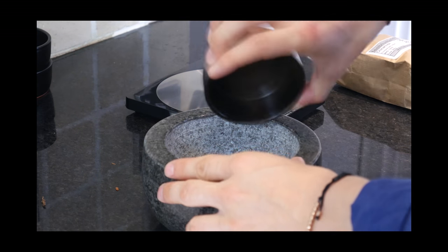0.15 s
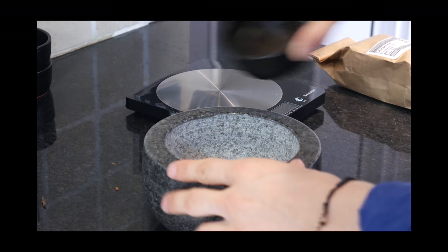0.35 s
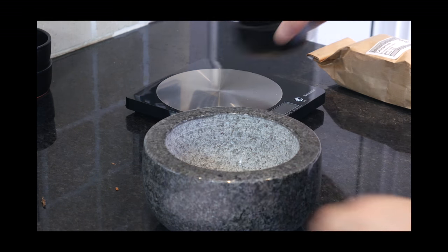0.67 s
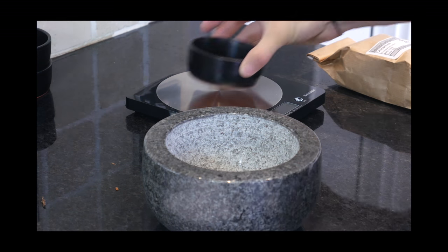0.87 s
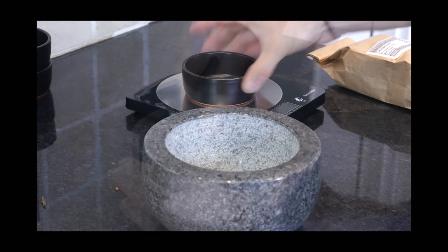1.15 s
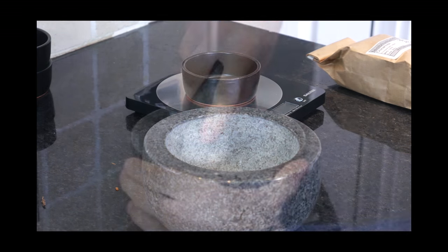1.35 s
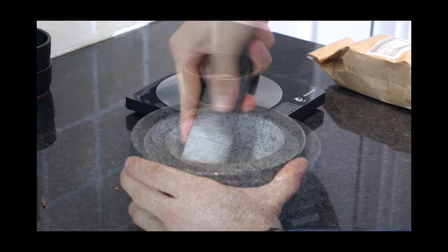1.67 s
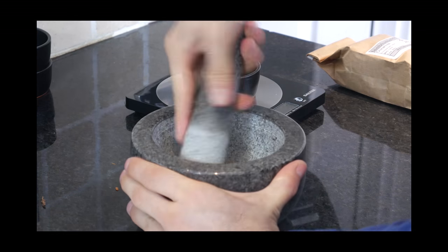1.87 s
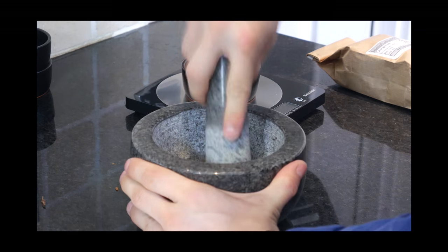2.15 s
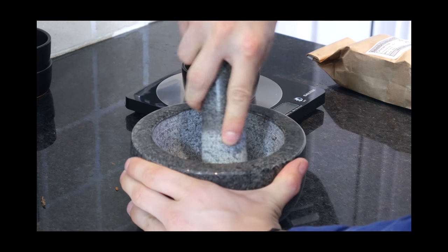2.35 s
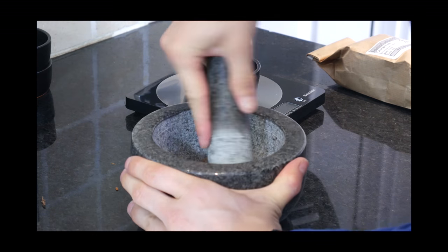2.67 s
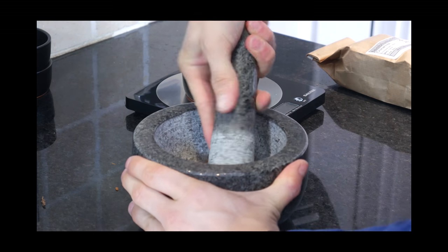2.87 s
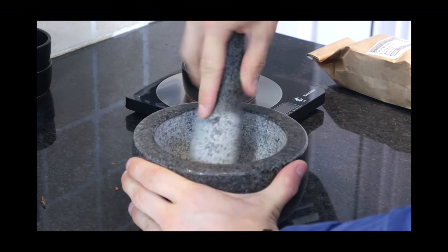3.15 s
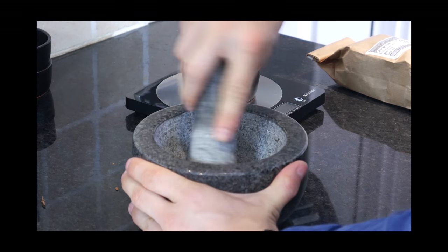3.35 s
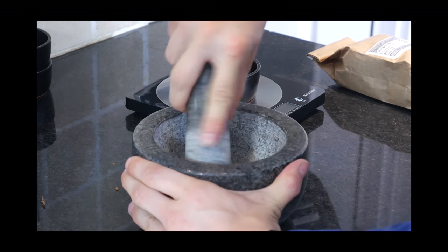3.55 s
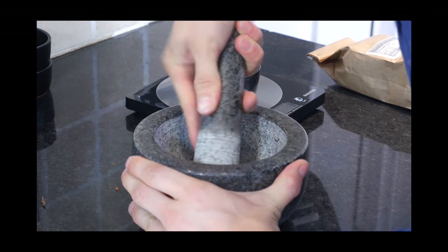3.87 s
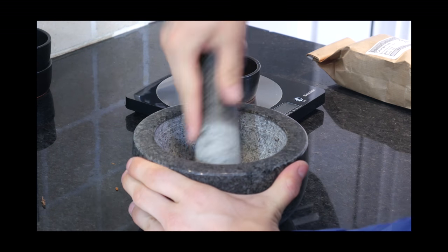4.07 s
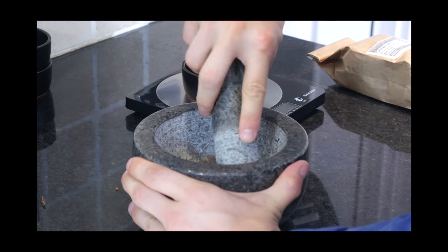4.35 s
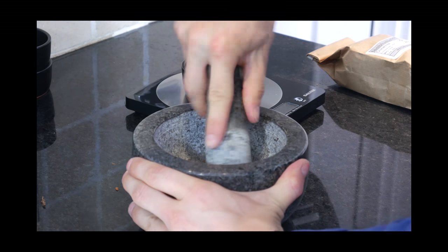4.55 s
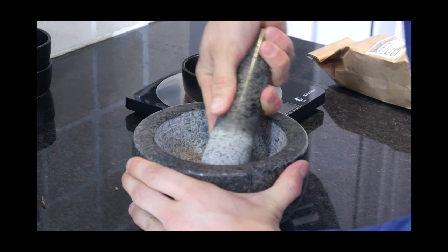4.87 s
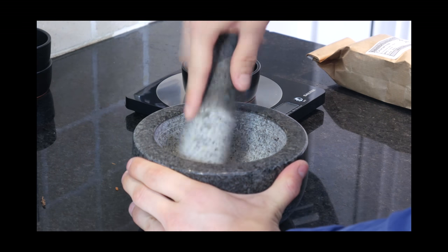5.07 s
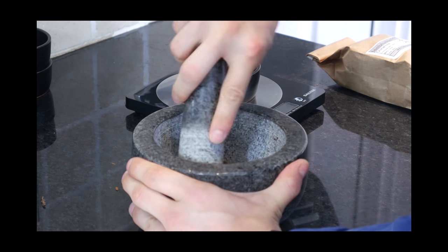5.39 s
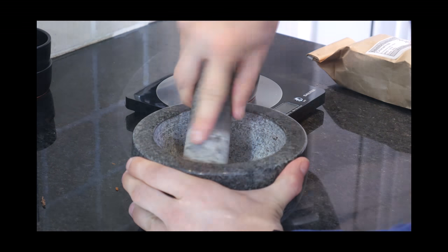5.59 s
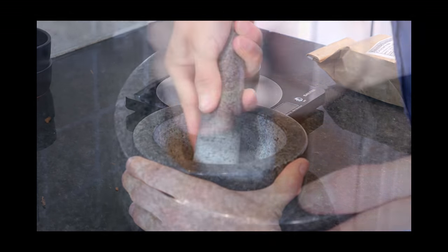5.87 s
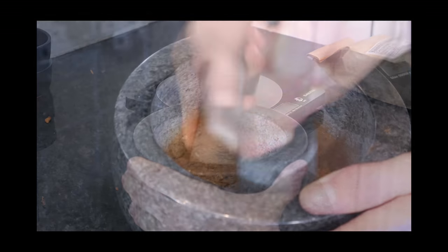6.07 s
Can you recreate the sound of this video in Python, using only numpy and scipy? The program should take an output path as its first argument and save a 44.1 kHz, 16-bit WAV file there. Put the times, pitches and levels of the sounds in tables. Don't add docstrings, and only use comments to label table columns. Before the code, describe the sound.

A soft finger knock and a brief bright dish clatter come first, over quiet room hiss. Stone then meets stone: dry, short mortar knocks, rough scrapes and small bark cracks, with dull thumps through the cabinet. The strongest blow briefly rings the bowl's lip. Miked closely in a small reflective kitchen, it ends in rapid grinding.

```python
import sys
import numpy as np
from scipy import signal
from scipy.fft import rfft, irfft, next_fast_len
from scipy.io import wavfile
from scipy.ndimage import uniform_filter1d

SR = 44100
rng = np.random.default_rng(int(sys.argv[2]) if len(sys.argv) > 2 else 0)


def file_out(sig):
    cols = np.atleast_2d(sig).T
    lim = np.clip(cols, -1, 1)
    pcm = np.round(lim * 32767).astype(np.int16)
    wavfile.write(sys.argv[1], SR, pcm)


def voltage_ratio(decibels):
    exponent = np.asarray(decibels, float) / 20
    return 10 ** exponent


N = 274302
TIME_S = np.arange(N) / SR
COARSE_S = np.arange(0, N / SR, 0.001)
SPOTS = 4
STEADY_DB = 2.2


def evened(x):
    return x / np.sqrt(np.mean(x ** 2) + 1e-20)


def read(points, hz):
    f, value = np.transpose(points)
    return np.interp(np.log(hz + 1), np.log(f + 1), value)


def ring(modes, contact_s, vary_db=17.0):
    t = np.arange(SR // 8) / SR
    hz, db, t60 = np.transpose(modes)[:, :, None]
    hz = hz + np.minimum(0.025 * hz, 22) * rng.standard_normal((SPOTS, len(modes), 1))
    waves = voltage_ratio(db - 60 * t / t60) * np.sin(2 * np.pi * hz * t)
    shares = voltage_ratio(vary_db * rng.standard_normal((SPOTS, len(modes)))) * (-1) ** np.arange(len(modes))
    struck = (shares[:, :, None] * waves).sum(axis=1)
    contact = np.hanning(round(contact_s * SR) + 3)
    x = signal.oaconvolve(struck, contact[None], axes=1)
    return x / abs(x).max(axis=1, keepdims=True)


def snap(colour, t60):
    t = np.arange(2048) / SR
    gain = voltage_ratio(read(colour, np.fft.rfftfreq(2048, 1 / SR)))
    x = irfft(rfft(rng.standard_normal((SPOTS, 2048))) * gain)
    x = x * voltage_ratio(-60 * t / t60) * np.minimum(t / 0.0014, 1)
    z = rfft(x)
    z = z * gain / uniform_filter1d(abs(z), size=15, axis=1)
    x = irfft(z) * (1 - t / t[-1]) ** 2
    return x / abs(x).max(axis=1, keepdims=True)


def blows(s, db):
    train = np.zeros(N)
    train[np.round(s * SR).astype(int)] = voltage_ratio(db)
    return train


def efforts(t, s, db, swell, fade):
    late = t[:, None] - s
    drop = (np.maximum(-late, 0) / swell) ** 1.91 + (np.maximum(late, 0) / fade) ** 0.88
    return 10 * np.log10((voltage_ratio(db - 30 * drop) ** 2).sum(axis=1) + 1e-14)


def joined(a_db, b_db):
    return np.logaddexp(a_db / 4, b_db / 4) * 4


def slips(db, per_s, spread_db, judder_db):
    where, luck = rng.random((2, N))
    size = voltage_ratio(spread_db * np.minimum(-np.log(luck + 1e-9), 5)) * (-1) ** np.arange(N)
    judder = evened(uniform_filter1d(uniform_filter1d(rng.standard_normal(N), 500), 500))
    clicks = size * (where < per_s / SR) * voltage_ratio(judder_db * judder)
    return evened(clicks) * voltage_ratio(np.interp(TIME_S, COARSE_S, db))


def play(answers, hits, rub=0, roam_s=0.034):
    drive = hits + rub / np.linalg.norm(answers, axis=1, keepdims=True)
    heard = np.flatnonzero(abs(drive[0]) > 1e-7)[-1] + 1
    spot = rng.integers(0, SPOTS, N)[(np.arange(heard) / (roam_s * SR)).astype(int)]
    here = spot == np.arange(SPOTS)[:, None]
    size = next_fast_len(heard + answers.shape[1])
    mix = rfft(drive[:, :heard] * here, size) * rfft(answers, size)
    return np.pad(irfft(mix.sum(axis=0), size), (0, N))[:N]


# f/Hz, likeness/1
HISS_LIKENESS = [(60, -0.96), (240, -0.021), (950, -0.077), (3770, 0.49), (15000, 0.59)]
# f/Hz, level/dB per Hz
HISS_COLOUR = [(20, -7), (60, -2.5), (125, -1.5), (200, 3.5), (600, -0.5), (2200, -11), (11700, -23.5),
               (16400, -35.5)]


def air():
    size = next_fast_len(N)
    hz = np.fft.rfftfreq(size, 1 / SR)
    a, b = rfft(rng.standard_normal((2, size)))
    same = np.clip(read(HISS_LIKENESS, hz), -1, 1)
    sides = np.array([a, same * a + np.sqrt(1 - same ** 2) * b])
    hiss = irfft(sides * voltage_ratio(read(HISS_COLOUR, hz)), size)[:, :N]
    waver = voltage_ratio(2.0 * evened(uniform_filter1d(rng.standard_normal(N), 4000)))
    hum = waver * np.sin(2 * np.pi * 100 * TIME_S)
    return voltage_ratio(-55) * evened(hiss) + voltage_ratio(-66.5) * hum


# t/s, level/dB
FINGER_KNOCK = [(0.626, -31.5)]
# f/Hz, level/dB per Hz
FINGER_COLOUR = [(88, -36), (150, 1.5), (349, 4.5), (638, -6), (1330, -2), (2350, -10), (12000, -31.5),
                 (15600, -64)]
# t/s, level/dB, thud relative level/dB, clatter relative level/dB
DISH_HITS = [(1.006, -59.5, 20, -15), (1.073, -19.5, -32, 7), (1.081, -22, -24, -18),
             (1.097, -22, -14.5, -33), (1.107, -31, -18, -25), (1.124, -15, -48, 0.5),
             (1.134, -27, -15, -15), (1.151, -35, -29, -18), (1.18, -32.5, -29, -23)]
# f/Hz, level/dB, t60/s
DISH_MODES = [(730, -4, 0.012), (827, 5, 0.0067), (880, 7, 0.021), (915, -11, 0.012), (1010, -14, 0.021),
              (1270, 3, 0.0034), (1520, 2, 0.029), (1610, 6, 0.011), (1730, -12, 0.012), (2010, -3, 0.0096),
              (2180, -1, 0.028), (2280, 3, 0.01)]
# f/Hz, level/dB, t60/s
THUD_MODES = [(268, 10, 0.12), (332, -20, 0.12), (398, 11, 0.12)]
# f/Hz, level/dB per Hz
CLATTER_COLOUR = [(520, -46), (1100, -7), (2400, 4), (2900, -6), (3660, -4), (5600, -12), (9780, -18),
                  (15300, -34)]
# loudest t/s, level/dB, swell/s, fade/s
RATTLES = [(1.074, -31, 0.0072, 0.046), (1.127, -34, 0.01, 0.057), (1.165, -51, 0.022, .08)]


def dish():
    at, peak, thud, clatter = np.transpose(DISH_HITS)
    out = play(snap(FINGER_COLOUR, 0.062), blows(*np.transpose(FINGER_KNOCK)))
    out += play(ring(DISH_MODES, 0.00048, STEADY_DB), blows(at, peak - 2), 0, 0.01)
    out += play(ring(THUD_MODES, 0.0026), blows(at, peak + thud - 2))
    rattle = slips(efforts(COARSE_S, *np.transpose(RATTLES)), 3000, 2.5, 1.5)
    return out + play(snap(CLATTER_COLOUR, 0.0074), blows(at, peak + clatter - 1), rattle, 0.00061)


# f/Hz, echo level/dB
ECHO_COLOUR = [(100, -1), (400, -4), (800, 0.5), (2000, -3.5), (8000, -0.5)]
# f/Hz, t60/s
KITCHEN_DECAY = [(100, 0.26), (260, 0.35), (700, 0.29), (1840, 0.32), (4850, 0.35), (12800, 0.26)]
# f/Hz, share/1
ECHO_SPREAD = [(100, 0.2), (1000, 0.66), (5000, 0.63), (12000, 0.94)]


def kitchen(x):
    taps = np.zeros((9, SR // 2))
    first, gap = 130, 20
    at = np.arange(first, SR // 2 - gap, gap) + rng.integers(0, gap, (9, (SR // 2 - first - 1) // gap))
    np.put_along_axis(taps, at, rng.choice([-1., 1.], at.shape), 1)
    hz, t, z = signal.stft(taps.reshape(3, 3, -1), SR, nperseg=256)
    z = z * voltage_ratio(read(ECHO_COLOUR, hz)[:, None] - 60 * t / read(KITCHEN_DECAY, hz)[:, None])
    sides = z[:, :1] + read(ECHO_SPREAD, hz)[:, None] * z[:, 1:]
    tail = signal.istft(sides, SR, nperseg=256)[1]
    shift_per_s = 3.3
    turn = np.sqrt(2 / 3) * np.cos(np.pi * (shift_per_s * TIME_S + np.arange(3)[:, None] / 3))
    size = next_fast_len(N + SR)
    wet = rfft(abs(turn) * x, size)[:, None] * rfft(tail / np.linalg.norm(tail[0, 0]), size)
    return irfft(wet.sum(axis=0), size)[:, :N]


# loudest t/s, level/dB, swell/s, fade/s, pestle ring relative level/dB
SCRAPES = [(1.543, -33.5, 0.022, 0.36, -18), (1.642, -30.5, 0.037, 0.24, -21),
           (1.71, -32.5, 0.024, 0.084, -19), (2.206, -20, .006, 0.31, -17), (2.465, -29, 0.015, 0.099, -14),
           (2.531, -21, 0.033, 0.044, -12.5), (2.555, -27, 0.043, 0.32, -17),
           (2.769, -13.5, 0.0032, 0.01, -15), (2.862, -26.5, 0.018, 0.18, -21),
           (3.413, -46.5, 0.17, 0.58, -16), (3.714, -30, 0.2, 0.15, -16), (3.824, -26, 0.041, 0.053, -7.5),
           (3.91, -32.5, 0.055, 0.26, -13), (3.866, -27, 0.012, 0.026, -18),
           (4.288, -48.5, 0.012, 0.25, -8), (4.424, -36.5, 0.016, 0.35, -13), (4.533, -42, .012, 0.063, 11),
           (4.625, -30.5, 0.085, 0.23, -16), (4.778, -26.5, 0.044, 0.17, -10),
           (4.843, -38.5, 0.08, 0.24, -13), (5.231, -40, 0.02, 0.049, 6.5),
           (5.357, -18.5, 0.008, 0.049, -11), (5.503, -32, 0.22, 0.16, -11.5), (5.59, -26, 0.06, 0.14, -41),
           (5.835, -32, 0.096, 0.1, -6.5), (5.885, -37, .04, 0.093, -6), (5.74, -46, 0.036, 0.11, 1.5),
           (6.018, -40.5, 0.044, 0.23, -1), (6.22, -42, 0.028, 0.081, -9)]


def scrape_level(pestle_share=0):
    top, rub, swell, fade, sing = np.transpose(SCRAPES)
    return efforts(COARSE_S, top, rub + pestle_share * sing, swell, fade)


# t/s, crack level/dB, crunch level/dB, fade/s
CRUSHES = [(1.38, -78, -63, 1), (1.537, -44.5, -40.5, 0.057), (1.632, -49, -45, 0.63),
           (1.88, -47, -58.5, 0.48), (1.96, -69, -63, 0.56), (2.191, -41, -64.5, 0.14),
           (2.414, -29, -71, .05), (2.453, -18.5, -40, 0.14), (2.529, -49, -46.5, 0.4),
           (2.621, -24.5, -45, 0.83), (2.767, -47.5, -44, 0.14), (2.845, -47, -37, 0.073),
           (3.31, -57.5, -47.5, 0.12), (3.41, -35.5, -49.5, 0.27), (3.618, -34, -51, 0.23),
           (3.655, -33, -48.5, 0.39), (3.702, -25.5, -46, 0.49), (4.0, -64, -55.5, 0.35),
           (4.284, -66, -53, 0.23), (4.421, -27, -56, 0.7), (4.525, -26, -41, 0.59), (4.728, -45, -46, 0.2),
           (4.762, -48, -67, 1), (4.967, -38, -66, .1), (5.341, -58, -41.5, 0.042),
           (5.235, -47, -49.5, 0.089), (5.521, -33.5, -50.5, 0.75), (5.582, -36, -53, 0.9),
           (5.781, -31, -50, 0.32), (5.975, -28.5, -50, 0.1), (6.019, -42, -42.5, 0.15),
           (6.21, -44.5, -48.5, 0.11)]
# f/Hz, level/dB per Hz
BARK_COLOUR = [(880, -45.5), (1500, -12), (1740, -8), (3220, -9.5), (5170, -5), (7690, -9), (12100, -9.5),
               (15700, -24)]


def bark():
    split, crack, crunch, settle = np.transpose(CRUSHES)
    grind = joined(efforts(COARSE_S, split + 0.00076, crunch, 0.028, settle), scrape_level() - 32)
    out = play(snap(BARK_COLOUR, 0.083), blows(split, crack - 3))
    return out + play(snap(BARK_COLOUR, 0.016), 0, slips(grind - 1, 4000, 1.1, 4.25), 0.0003)


# t/s, bowl level/dB, then wall, rim and pestle ring
# relative level/dB
KNOCKS = [(1.54, -24.5, -3, -42, -3.5), (1.574, -25, 4, -1, 9.5), (1.632, -22.5, -5, -28, -23),
          (1.706, -21, -7, -16, -7), (2.192, -7, 3.5, 4, -15), (2.196, -25.5, 2, -9, -21),
          (2.456, -21.5, -3, -14, -7.5), (2.529, -22.5, 11.5, -5.5, -25), (2.623, -20, -8, -5, -12),
          (2.766, -20.5, 12, -23, -40), (2.771, -13.5, -17, -0.5, -45), (2.856, -15.5, 8, -7, -45),
          (2.861, -11, -6, -7.5, -40.5), (3.566, -37, -3, -4, -6), (3.658, -31, 3, -21, -15),
          (3.693, -28, -15, -19, -18), (3.706, -28, 7.5, 1, -1), (3.806, -37, 7, 1, -5),
          (3.815, -28, 2, 0, -19), (3.826, -25, 9, 3, -28), (3.862, -26, 8, -2.5, -22),
          (3.871, -27.5, 4, -2, -17), (3.906, -26, 4, -8, -10), (3.917, -26.5, 5.5, -5, -11),
          (4.287, -29, -8.5, -32, -35), (4.422, -29.5, -1.5, 0, 5), (4.526, -38.5, 5, -29, 13),
          (4.62, -33, 3, -13, 1), (4.785, -27.5, 4, -9, -16), (4.764, -23, -6, -10, -15),
          (4.84, -26.5, 0.5, -0.5, -16), (4.858, -35, 3, -15, -11), (5.219, -12, -3.5, -3.5, -8),
          (5.354, -10.5, -7, 3.5, -10), (5.359, -27.5, -9, 4, -24), (5.587, -10.5, -8.5, -36, -39),
          (5.779, -33, -2, -7, -20), (5.798, -24.5, 4, -5.5, -12), (5.831, -28, 3, -14, -14),
                (5.839, -23.5, 6, -11, -14), (5.876, -33, 8, -2, -14), (5.888, -31, 8, 3, -15),
                (5.92, -36, 9.5, -6, -15), (5.976, -36.5, -1, 4, 3.5), (6.012, -32.5, -5, 4, -10),
                (6.018, -21.5, 0, -8, -32), (6.21, -39, -1, 7, -11)]
# t/s, wall relative to bowl level/dB
CLIMB = [(1.5, -2), (1.7, -4), (2.2, 4.5), (2.46, -6.5), (2.54, 5), (2.65, -5), (2.78, -6), (2.9, 3),
         (3.5, -10), (3.7, -18), (3.85, 7), (4.3, -8), (4.62, -5), (4.8, -5.5), (5.3, 7.5), (5.6, -6),
         (5.86, 6.5), (6.2, -1)]
# t/s, shaft ring left free level/dB, height on the bowl wall as rim level/dB
GRIP = [(1.5, -12, -15.5), (2.19, -14, -7.5), (2.7, -13, -14), (3.1, -10, -23.5), (3.8, -19, -14.5),
        (4.3, -20, -10.5), (4.53, -5, -18), (4.62, 1, -15.5), (4.65, -22, -21.5), (4.72, -14, -14),
        (4.79, -2, -12.5), (4.9, -6, -7.5), (5.25, -1.5, 8), (5.45, -7, -11), (5.56, -20, -19.5),
        (5.85, -22, -6), (6.15, -16, -3), (6.22, -4, 6)]
# f/Hz, level/dB, t60/s
BOWL_MODES = [(512, -4.5, 0.02), (552, -3, 0.029), (616, 1.5, 0.037), (595, -3.5, 0.022), (671, -8, 0.021),
              (718, -3.5, 0.021)]
# f/Hz, level/dB, t60/s
WALL_MODES = [(793, -6.5, 0.036), (822.5, -3, 0.021), (866.6, 0, 0.044), (902, -13, 0.021),
              (975, -0.5, 0.022), (1031.7, 1.5, 0.036), (1079, -0.5, 0.029), (1143, -2, 0.024),
              (1219, -5, 0.026), (1272, -5.5, 0.018), (1340, -2.5, 0.022)]
# f/Hz, level/dB, t60/s
RIM_MODES = [(1230, -3, 0.02), (1347, 2.5, 0.027), (1408, 4.5, 0.0093), (1450, 11.5, 0.0051),
             (1391, -2.5, 0.021), (1748, 2, 0.0095), (1879, 4.5, 0.011), (1975, 1, 0.016),
             (2337, 3, 0.0064), (2488, -9.5, 0.02), (2666, -16, 0.018), (3050, -6, 0.0097),
             (3400, -5.5, 0.0046), (4330, -5, 0.003)]
# f/Hz, level/dB, t60/s
PESTLE_MODES = [(4760, -10, 0.012), (5050, -7, 0.014), (5270, 3, 0.03), (5200, -4, 0.014),
                (5350, -2, 0.014), (3090, -13, 0.012), (12420, -10.5, 0.012), (5520, -9, .01)]
# f/Hz, level/dB, t60/s
SHAFT_MODES = [(4130, 0, .035), (5280, 0, .04), (9260, -4, .02), (12550, -11, .016)]


def mortar_and_pestle():
    at, peak, side, rim, chime = np.transpose(KNOCKS)
    grip, shaft, height = np.transpose(GRIP)
    scrape = scrape_level()
    on_wall = scrape + np.interp(COARSE_S, *np.transpose(CLIMB))
    on_rim = scrape + np.interp(COARSE_S, grip, height)
    out = play(ring(BOWL_MODES, 0.00048, STEADY_DB), blows(at, peak - 2), slips(scrape - 6, 550, 4.97, 3.4))
    out += play(ring(WALL_MODES, 0.00026, STEADY_DB), blows(at, peak + side - 2),
                slips(on_wall - 6, 900, 3.75, 3.3), 0.02)
    out += play(ring(RIM_MODES, 0.00012, STEADY_DB), blows(at, peak + rim + 0.57),
                slips(on_rim + 0.34, 1200, 3.47, 0.72))
    taps = blows(at, peak + chime - 2)
    grit = slips(scrape_level(1) - 4, 2500, 3.8, 0.5)
    free = voltage_ratio(np.interp(TIME_S, grip, shaft))
    out += play(ring(PESTLE_MODES, 0.00003, STEADY_DB), taps, grit)
    return out + play(ring(SHAFT_MODES, 0.00003, STEADY_DB), free * taps, free * grit)


# t/s, thud level/dB, rumble level/dB, fade/s, weight as bass tilt/dB
PUSHES = [(1.541, -26, -40, 0.027, -12), (1.708, -49, -28.5, 0.044, -3.5), (1.882, -37, -43.5, 0.13, 6),
          (2.192, -13, -26, 0.31, -1.5), (2.532, -35, -34, 0.68, -3.5), (2.768, -11.5, -25, 0.022, -9),
          (2.786, -23, -30.5, 0.2, -11), (2.858, -26, -33.5, 0.1, 10.5), (3.306, -48, -34, 0.21, 6),
          (3.414, -35, -40.5, 0.38, -3), (3.719, -58, -39.5, 0.11, -7.5), (4.028, -34.5, -36, 0.084, 2),
          (4.286, -19, -30, 0.12, 9), (4.423, -22, -39, 1, 3.5), (4.446, -36, -40, .05, 3),
          (4.527, -22, -33, 0.25, 0), (4.841, -37, -35.5, 0.11, 0.5), (5.219, -22, -19, 0.12, -1),
          (5.352, -20, -19, 0.086, -1.5), (5.597, -28.5, -42, 0.21, -11.5), (5.788, -27, -30.5, 0.35, -6.5),
          (5.975, -24.5, -31.5, 0.18, 4), (6.02, -10.5, -35, 0.22, -10.5), (6.056, -42, -31, .1, -2),
          (6.093, -22.5, -38, 0.034, -5), (6.21, -30.5, -26, 0.12, 4)]
# f/Hz, level/dB, t60/s
CABINET_MODES = [(74.5, -4, 0.021), (104, -9.5, 0.032), (150, 3.5, 0.012), (121, 9.5, 0.01),
                 (184.8, -1.5, 0.046), (247, -3, 0.092)]
# f/Hz, level/dB, t60/s
WORKTOP_MODES = [(295, -21, 0.005), (314.5, 1, 0.042), (338.4, -1, 0.043), (343.3, -5, 0.053),
                 (386, -2, 0.066), (427, -4, 0.029), (517.4, -9, 0.023)]


def worktop():
    lean, thud, rumble, ease, weight = np.transpose(PUSHES)
    scrape = scrape_level()

    def rumble_level(tilt):
        push = efforts(COARSE_S, lean + 0.015, rumble + tilt * weight, 0.022, ease)
        return joined(push, scrape - 14 - 11 * tilt)

    hits = blows(lean, thud - 5)
    out = play(ring(CABINET_MODES, 0.00093, STEADY_DB), hits, slips(rumble_level(1) - 5, 300, 1.8, 0.79))
    return out + play(ring(WORKTOP_MODES, 0.0004, STEADY_DB), hits, slips(rumble_level(-1) - 7, 400, 3.2, 2.8))


# t/s, level/dB
BEAD_TINKS = [(1.955, -45), (2.045, -59.5)]
# f/Hz, level/dB, t60/s
BEAD_MODES = [(3710, -2.5, 0.054), (2000, -8.5, .05)]


def bracelet():
    return play(ring(BEAD_MODES, 0.00003, 0), blows(*np.transpose(BEAD_TINKS)))


# t/s, level/dB
EDGE_BLOWS = [(2.192, -32), (5.354, -45)]
# f/Hz, level/dB, t60/s
LIP_MODES = [(4900, 3, 0.066), (8250, -11, .03), (8470, -5, 0.032), (8470, -5.5, 0.028), (9000, -9, .04),
             (9200, -5.5, 0.063), (9960, -21, .03), (11200, -19, .05), (12400, -17.5, 0.036),
             (13100, -16, .03), (13500, -16, .04)]


def lip():
    t = np.arange(SR // 8) / SR
    answer = sum(voltage_ratio(db - 60 * t / t60) * np.sin(2 * np.pi * hz * t) for hz, db, t60 in LIP_MODES)
    return signal.oaconvolve(blows(*np.transpose(EDGE_BLOWS)), answer)[:N]


# t/s,
# level/dB, swell/s, fade/s
SHOVES = [(2.64, -44, 0.13, 0.18), (3.315, -42.5, 0.018, 0.36), (3.83, -57, 0.62, .12),
          (4.3, -59, 0.033, 0.26), (4.85, -39.5, 0.056, 0.14), (5.4, -44, 0.13, 0.18),
          (5.977, -37, 0.0067, 0.015), (6.1, -45, 0.19, 0.18)]


def slab():
    band = signal.butter(3, [68.8, 149], "band", fs=SR, output="sos")
    mid, side = evened(signal.sosfilt(band, rng.standard_normal((2, N))))
    lumps = mid + np.outer([0.36, -0.36], side)
    return lumps * voltage_ratio(np.interp(TIME_S, COARSE_S, efforts(COARSE_S, *np.transpose(SHOVES))))


def scene():
    no_bass = signal.butter(3, 95, "high", fs=SR, output="sos")
    room_tone = air()
    pot = signal.sosfilt(no_bass, dish() + bracelet())
    stone = signal.sosfilt(no_bass, bark() + mortar_and_pestle() + worktop() + lip())
    near = stone + pot * voltage_ratio(np.array([[0.5], [-0.5]]))
    echo = kitchen(voltage_ratio(-1) * stone + voltage_ratio(4.0) * pot)
    return voltage_ratio(-1.0) * near + echo + room_tone + slab()


def low_pass(x):
    return signal.sosfilt(signal.butter(12, 16300, fs=SR, output="sos"), x)


# f/Hz, left minus right level/dB
MIC_LEAN = [(60, 3), (240, -1.5), (950, 0.5), (3770, 0), (15000, 0.5)]


def record(dry):
    size = next_fast_len(N)
    hz = np.fft.rfftfreq(size, 1 / SR)
    notch_db = -12 / (1 + ((hz - 7900) / 90) ** 2)
    top_db = -25 * np.maximum(hz / 1000 - 15.6, 0)
    lean_db = np.outer([0.5, -0.5], read(MIC_LEAN, hz))
    x = irfft(rfft(dry, size) * voltage_ratio(notch_db + top_db + lean_db), size)[:, :N]
    return low_pass(np.clip(x, -0.96, 0.96))


dry = scene()
out = record(dry)
file_out(out)
```